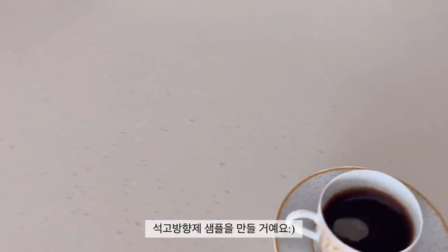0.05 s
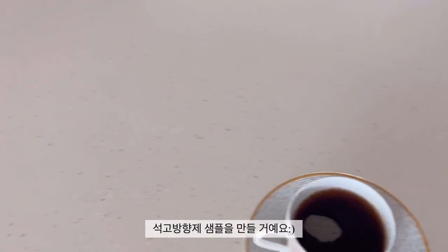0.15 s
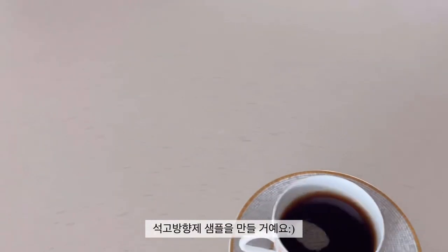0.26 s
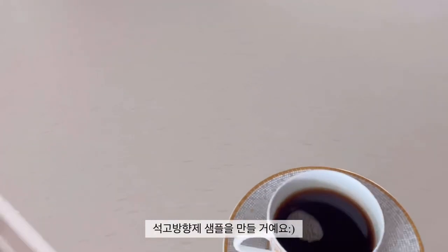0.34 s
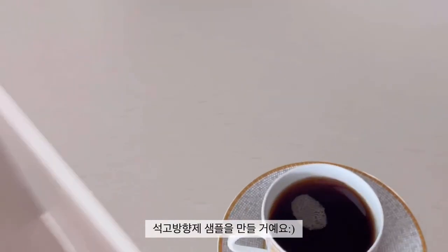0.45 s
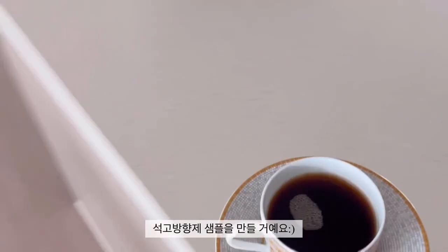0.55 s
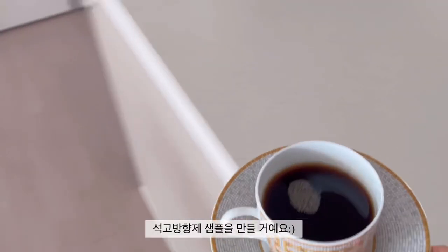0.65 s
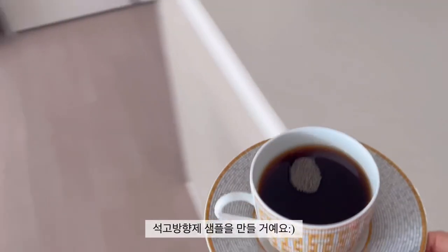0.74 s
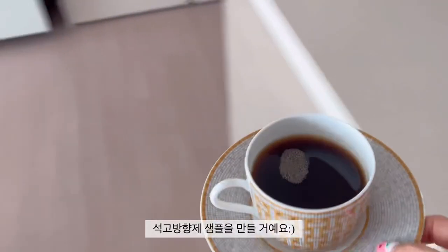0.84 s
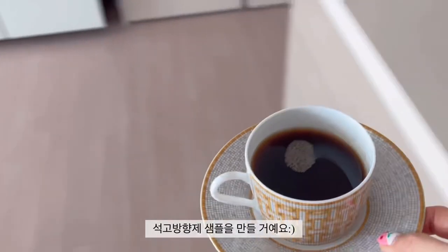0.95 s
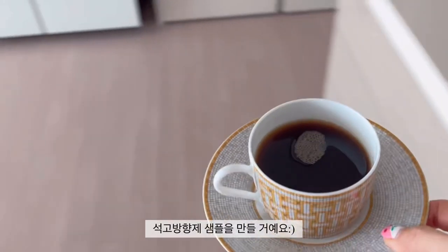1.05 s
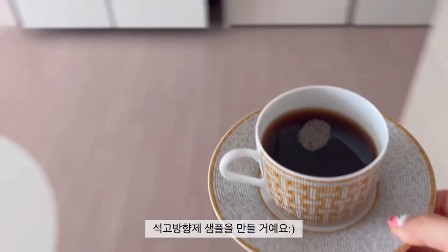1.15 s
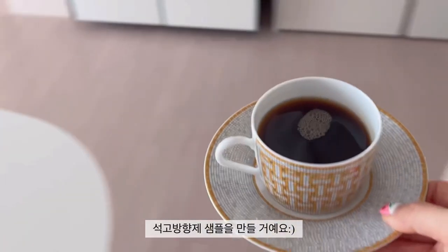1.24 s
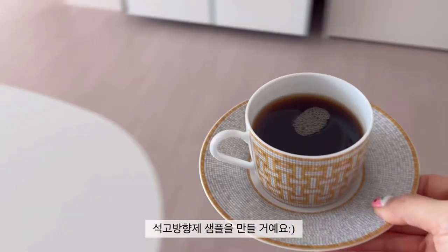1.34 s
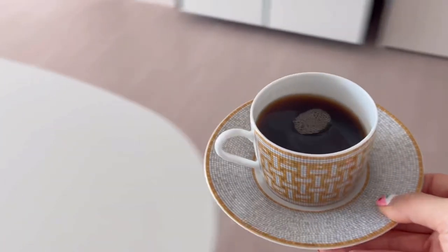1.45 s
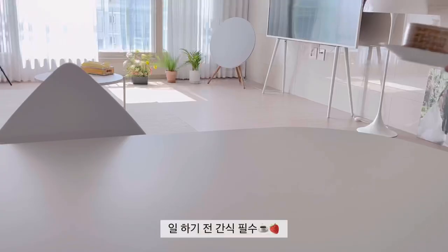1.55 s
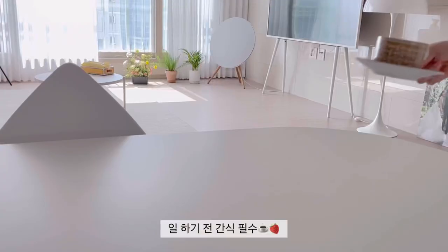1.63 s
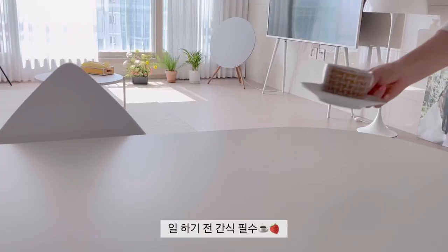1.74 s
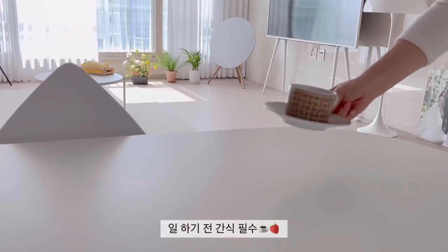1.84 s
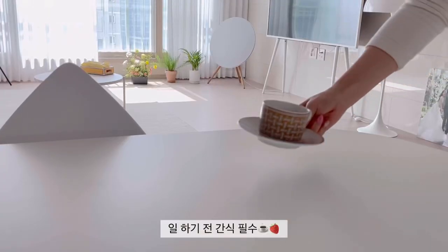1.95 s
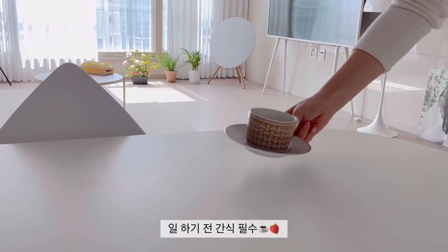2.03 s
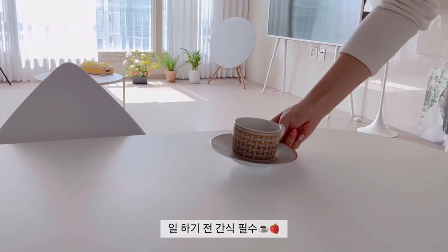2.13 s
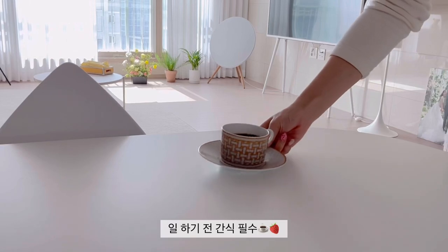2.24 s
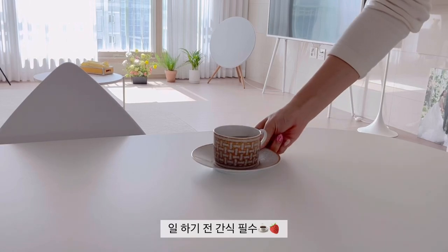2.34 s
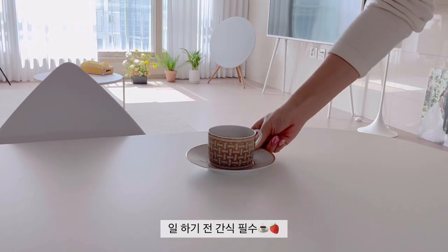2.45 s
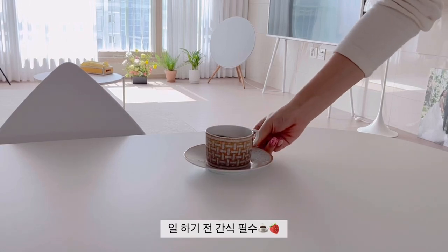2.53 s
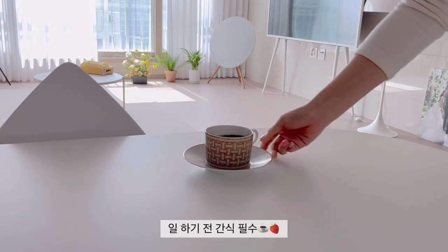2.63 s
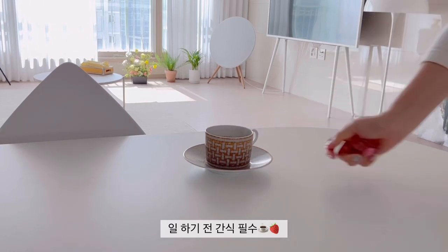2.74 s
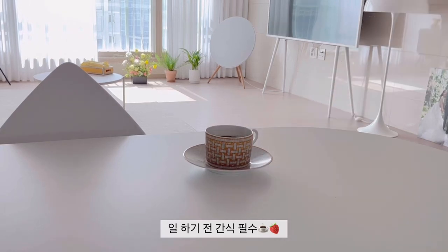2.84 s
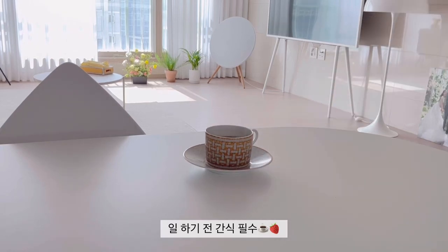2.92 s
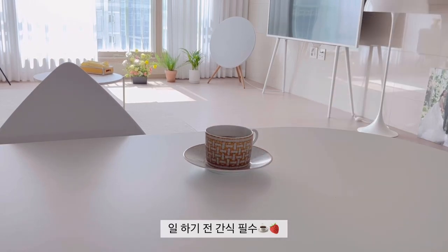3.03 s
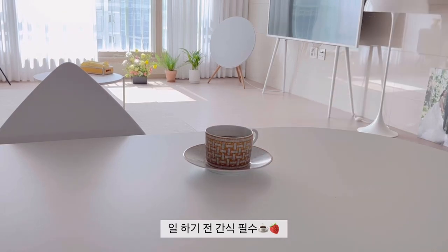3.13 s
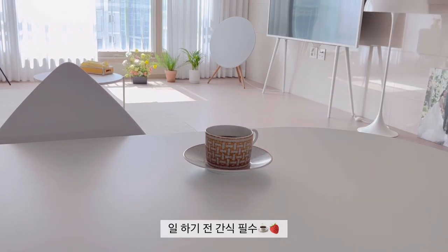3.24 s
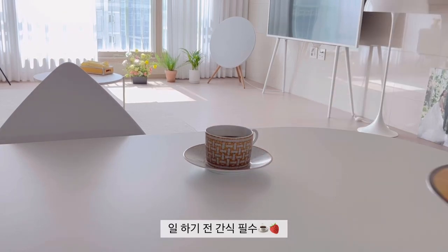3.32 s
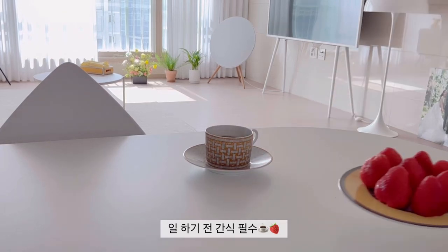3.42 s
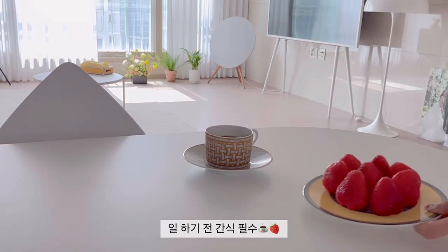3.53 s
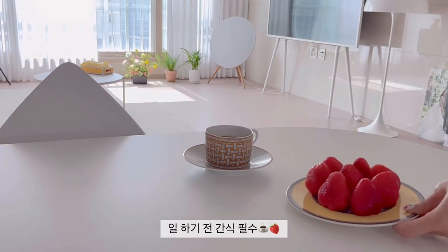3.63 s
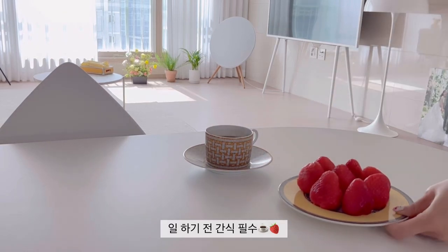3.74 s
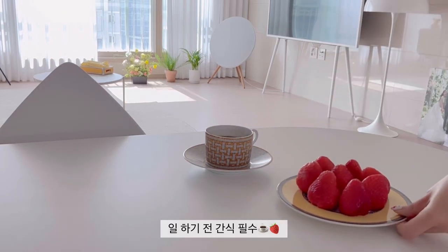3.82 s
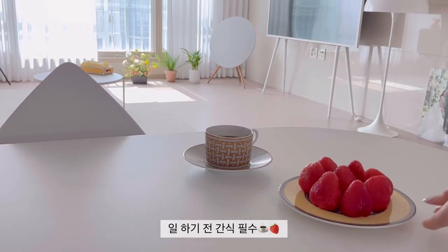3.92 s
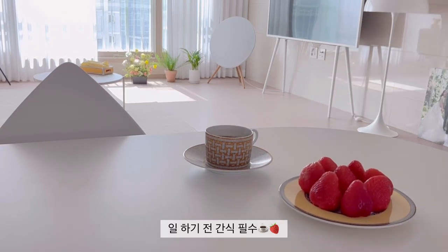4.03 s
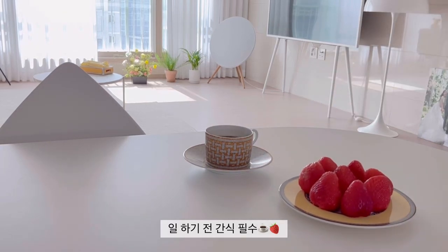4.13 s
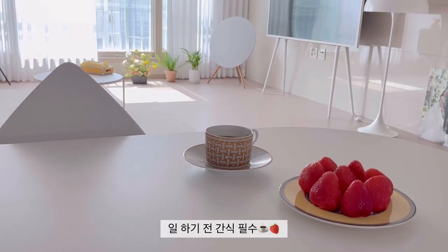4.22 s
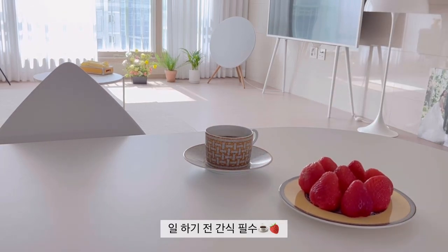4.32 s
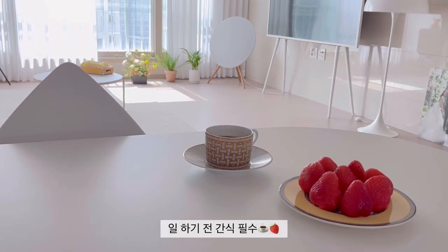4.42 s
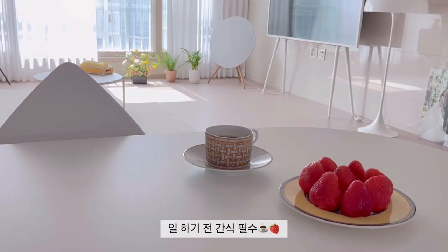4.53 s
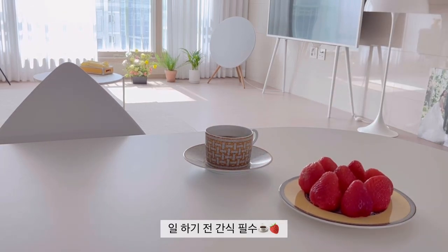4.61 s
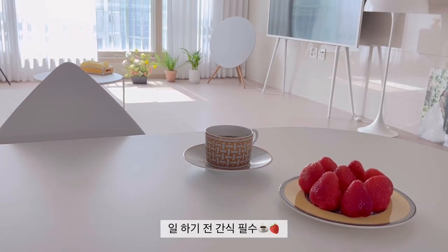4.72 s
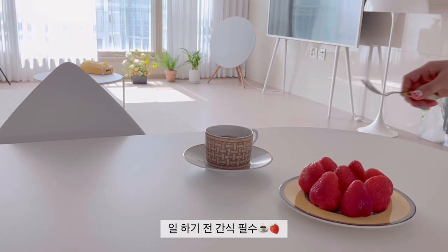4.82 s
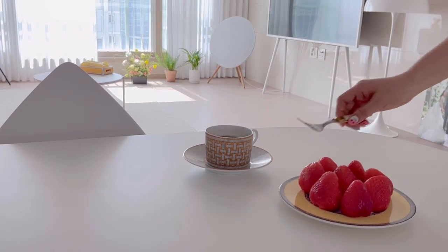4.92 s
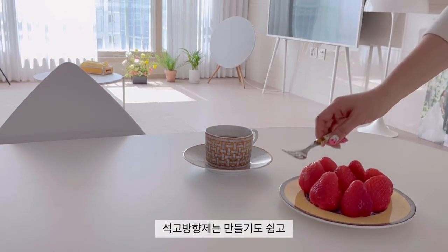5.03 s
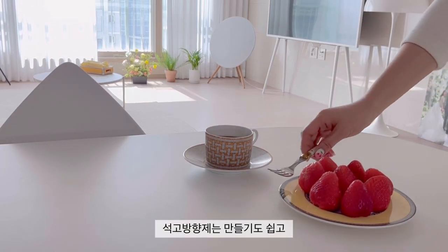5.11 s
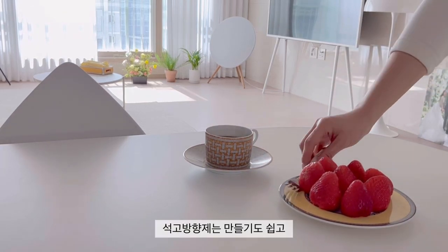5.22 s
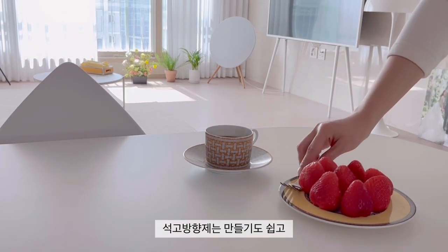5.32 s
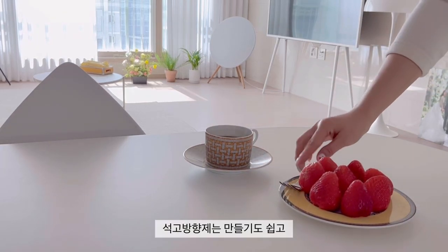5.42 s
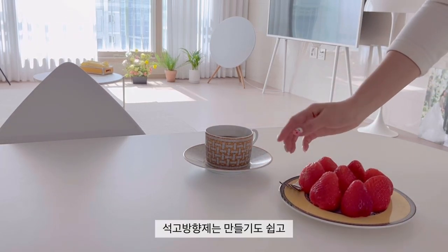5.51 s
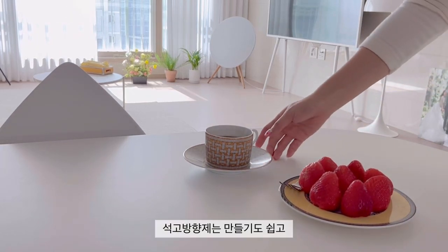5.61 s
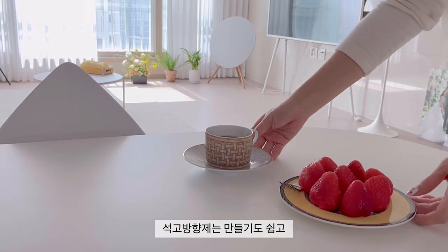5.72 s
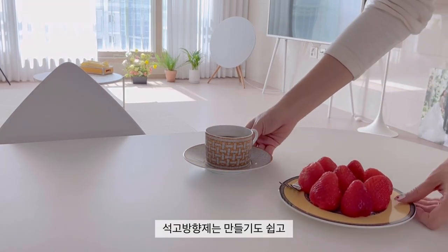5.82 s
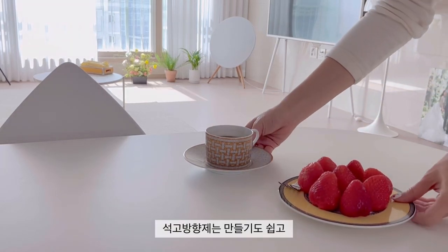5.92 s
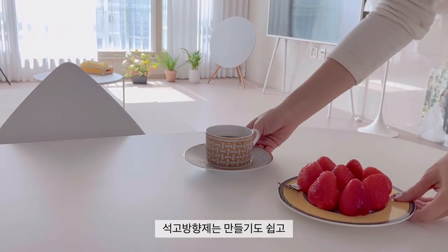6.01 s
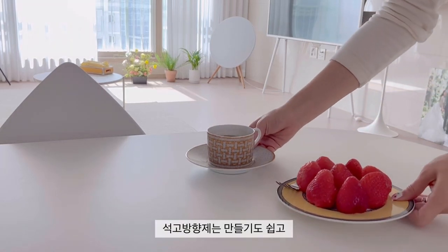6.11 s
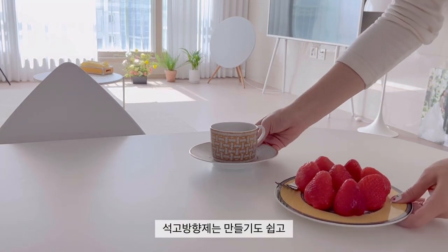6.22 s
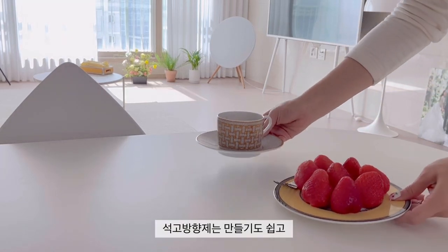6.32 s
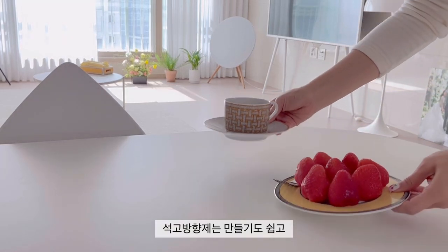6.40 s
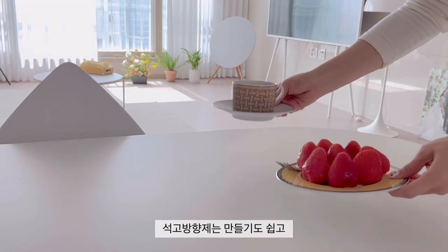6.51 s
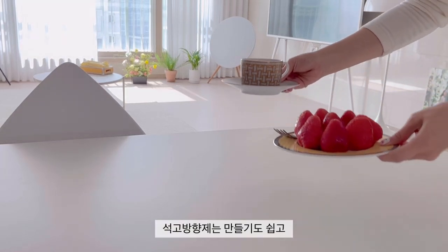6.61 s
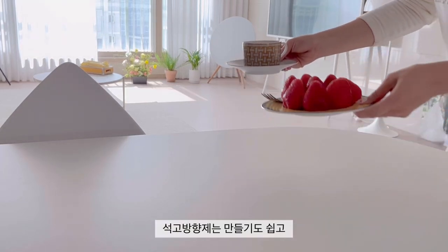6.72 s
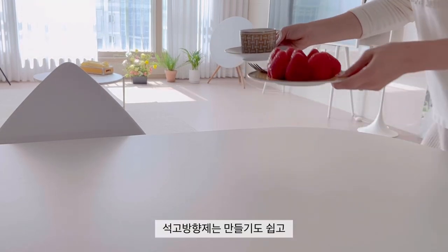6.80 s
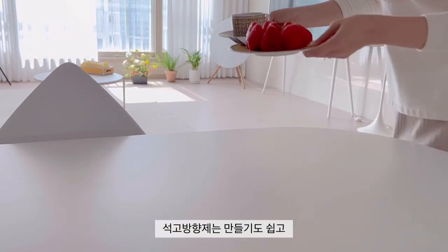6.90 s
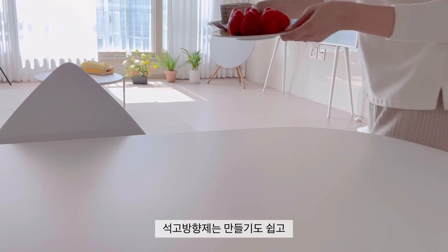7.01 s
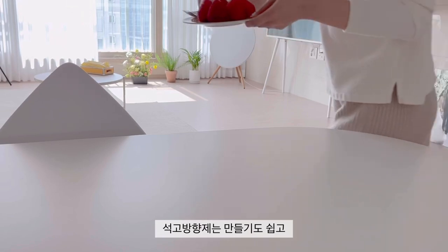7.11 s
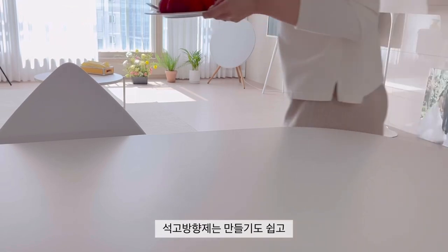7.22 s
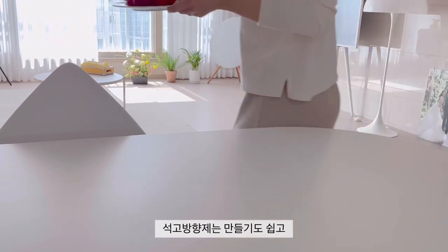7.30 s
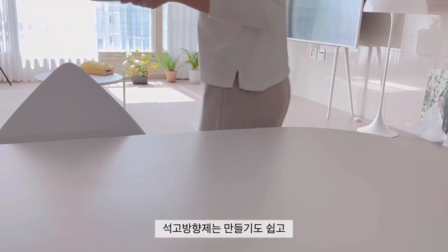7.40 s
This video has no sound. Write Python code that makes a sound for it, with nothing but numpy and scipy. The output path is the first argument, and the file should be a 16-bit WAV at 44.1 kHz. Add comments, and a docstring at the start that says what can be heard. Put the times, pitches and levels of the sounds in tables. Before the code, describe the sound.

A quiet, bare, reflective room with soft low rumble, heard closely in stereo. From 0 to 1.4 s a cup ticks faintly and irregularly on its saucer, dull and small, with barely audible brushing; a clearer soft swish comes at 1.65. At 2.18 the saucer hits the hard table with a firm knock, followed by a louder, sharper one at 2.33, woody with slight porcelain ring and short room tail. Near-quiet follows until a hiss at 3.5 and a single plate thud at 3.63, with a small settling scrape at 3.9. At 4.8 soft heel thuds, ticks and a slipper scuff. A fork clinks brightly in four quick contacts, 5.2 to 5.4. Faint grip clicks at 5.6 to 5.75; low, juddering drags from 5.8 to 6.4, strongest at 6.03, with a light clink at 6.21. Light brushing and muffled heel thuds at 6.76, 7.25 and 7.36 close it.

```python
"""A cup rattles faintly on its saucer as it is carried in, then the pair is set on a hard table in a bare room.
A plate follows, a fork is laid on it, and both are dragged and lifted; slippers scuff, heels thud.
Contacts are dying sines plus noise bursts; the drag is slip pulses through resonances plus gritty noise.
Brushing, scraping and room tone are shaped noise. Walls answer the crockery; playing speed scales their
answer and the stereo pattern by section."""
import sys
import numpy as np
from scipy import signal
from scipy.fft import rfft, irfft, next_fast_len
from scipy.io import wavfile
from scipy.ndimage import map_coordinates

SR = 44100
rng = np.random.default_rng(int(sys.argv[2]) if len(sys.argv) > 2 else 0)


def unload_wav(signal):
    """Save mono or channel-first audio to the path in sys.argv[1] as 16-bit WAV at rate SR, clipped to [-1, 1]."""
    wavfile.write(
        sys.argv[1],
        SR,
        np.round(np.clip(np.atleast_2d(signal).T, -1, 1) * 32767).astype(np.int16),
    )


N = 328759

# Contacts of saucer, plate, fork, gripped plate, lifted pieces:
# t/s, level/dB, ring/dB re level, puff/dB re level, hardness/(dB/octave), decay length/x
SAUCER_HITS = [(2.18, -16, -38, -3.5, -1.5, 0.69), (2.198, -25, -34.5, 0, 0.03, 0.26),
               (2.330, -13.5, -28, -6.5, -0.58, 0.48)]
PLATE_HITS = [(3.629, -19.5, -8.5, -5, 1, 1), (3.904, -38.5, -33, 3.5, 0.18, 0.35),
              (3.92, -43, -8.5, -2, 0.39, 0.546)]
FORK_HITS = [(5.206, -21, -8.5, -15.5, -0.67, 1.96), (5.296, -15, -5, -20.5, 0.67, 0.76),
             (5.362, -26.5, -8.5, -5.5, -1.2, 1.6), (5.406, -25, -4.5, -13, 0.5, 0.81)]
GRIP_HITS = [(5.6082, -49, -2, -1.5, 0.14, 1), (5.667, -33.5, -3, -6.5, 0.51, 0.64),
             (5.6744, -34, -6.5, -9.5, 0.71, 0.98), (5.7394, -48, 7, -5.5, 0.45, 0.38)]
LIFT_HITS = [(6.1075, -62, -11, -7, 0.6, 0.83), (6.1812, -53.5, -11.5, -18, 0.63, 1),
             (6.2106, -28, -6.5, -11.5, 0.16, 1)]

# Modes of each object: f/Hz, level/dB, t60/s; each contact scales t60 by its length, except for the cup
TABLE_MODES = [(65, -22, .5), (101.5, -22, 0.31), (157, -18.5, 0.52), (218.1, -14, 0.3), (307, 1.5, 0.41),
               (359.8, -6, 0.34), (569, -18.5, 0.49), (660, -8, 0.12), (711, -16, 0.4), (816, -4, .15),
               (1040, -15, 0.15), (1184, -11, 0.067), (1547, -9, 0.45), (1680, -11, 0.2), (2050, -18, .1),
               (2449, -4, 0.069), (2660, -7.5, 0.041)]
CUP_MODES = [(1766, 3, .25), (3671, -1, .33), (3725, -4, .33), (4323, -4, .3), (4360, -9, .3),
             (5114, -3, .3), (5180, -3, .2), (6961, -8, .35), (8021, -22, .2), (9028, -14, .2),
             (9500, -22, .2), (10860, -22, .3), (11300, -26, .3)]
PLATE_MODES = [(231, -6, .17), (280, -1, .19), (388, 1, .1), (550, -10, .08), (750, -10, .06),
               (1130, -7, .07), (1290, -2, .06), (1497, -9, .06), (1690, -11, .05), (2040, 2.5, .04),
               (2589, -12, .04), (3500, -18, .03)]
FORK_MODES = [(3467, -16, .08), (3950, -3, .012), (5440, 0, .024), (5425, -23, .2), (7700, -3, .022),
              (7720, -25, .25), (750, -14, .03), (1750, -18, .08), (10190, -8, .05), (13020, -6, .025),
              (13530, -18, .04), (15080, -24, .02)]
GRIPPED_MODES = [(2070, 0.5, 0.0093), (2380, 10.5, 0.005), (3480, -7.5, 0.025), (5860, -19.5, 0.0063),
                 (7700, -15, 0.011)]
LIFTED_MODES = [(1620, -7, .04), (2800, -5, .02), (4490, 0, .01), (6089, -8, .07), (8070, -14, .03),
                (10370, -8, .04), (12980, -12, .03)]

# Puff colours: dense table modes under saucer, under plate, small hard contacts; f/Hz, relative density/dB
KNOCK_SPECTRUM = [(60, -63.5), (140, -14.5), (300, 3.5), (700, -6.5), (1700, -8), (3000, -20),
                  (4400, -45.5), (9600, -60), (13000, -78.5)]
THUD_SPECTRUM = [(90, -59), (200, -4.5), (380, 4.5), (800, -2.5), (1400, 2.5), (2200, -9.5), (4000, -25.5),
                 (8000, -53), (14000, -51)]
CLATTER_SPECTRUM = [(200, -51), (500, 11.5), (1500, 8.5), (4000, 2.5), (8000, -2.5), (11000, -17),
                    (14000, -12), (17000, -24.5)]

# Pulls of the plate's foot over the top: start/s, length/s, judder/dB, scrape/dB
PULLS = [(5.827, 0.12, -63.5, -78), (6.025, 0.17, -44, -62.5), (6.218, 0.15, -58, -70)]
# Resonances driven by the drag: f/Hz, width/Hz, level/dB
DRAG_RESONANCES = [(209, 66, -11.5), (343, 110, -11), (430, 69, -8), (522, 195, -16.5)]

# Cup on saucer: t/s, tick level/dB, ring level/dB, tick f/Hz, tick t60/s
RATTLE = [(0.142, -60, -74.5, 1440, .025), (0.177, -58.5, -82, 980, 0.11), (0.311, -57, -73.5, 970, 0.031),
          (0.371, -53, -83, 890, 0.042), (0.411, -62, -97, 1110, 0.044), (0.591, -70, -93, 880, .05),
          (0.771, -60.5, -92, 860, 0.15), (0.827, -57, -77.5, 860, 0.043),
          (1.329, -63.5, -90.5, 1160, 0.038)]
# Small dry ticks: t/s, level/dB, f/Hz, t60/s
TICKS = [(0.188, -68, 4100, 0.022), (0.2018, -61, 4010, 0.018), (2.7795, -78, 1520, .015),
         (2.8994, -72, 2160, 0.016), (4.79, -47, 3370, 0.0094), (4.8344, -47.5, 2410, 0.023),
         (6.846, -66, 1030, .08), (7.055, -60, 335.4, 0.073)]
# Tail of an earlier clink, also the dry part of a tap: f/Hz, relative density/dB
FADING_SPECTRUM = [(400, -23), (900, -5), (1700, 4), (2600, -13), (5000, -22), (9000, -26)]

# Heels on the floor: t/s, level/dB, floor f/Hz, t60/s, overtones/dB re level
HEELS = [(4.779, -42.5, 95, 0.17, -5.5), (4.808, -42.5, 86, 0.32, -4.5), (6.759, -42, 67, 0.23, -17.5),
         (7.25, -34, 70.7, 0.2, -27), (7.359, -44.5, 59.2, 0.18, -16)]

# Brushing and scraping noises: slippers, sleeves, fingers, plate settling or sliding, rattle as it is gripped:
# start/s, rise/s, hiss/dB, fade t60/s, rasp/dB re hiss
STROKES = [(0.185, 0.035, -79.5, .2, 1.5), (0.785, 0.02, -82, 0.33, -9), (0.945, 0.023, -83.5, 0.17, -17),
           (1.06, 0.087, -90.5, .5, -2), (1.52, .012, -86.5, 0.84, -3.5), (1.64, 0.043, -59, 0.53, -1),
           (2.788, 0.019, -77, 0.12, -15), (2.89, 0.015, -85, .27, 3), (3.44, 0.058, -74, 0.44, -15),
           (3.513, 0.03, -61.5, .3, -15.5), (3.65, 0.055, -87.5, 0.62, 17), (3.86, 0.029, -78.5, 0.2, 9.5),
           (3.9, .015, -62.5, 0.083, 2), (3.985, 0.02, -72.5, 0.29, -15), (4.145, 0.02, -83, 0.29, -15),
           (4.75, 0.015, -74.5, 0.24, -28), (4.784, 0.017, -63, 0.28, 3.5),
           (4.988, 0.019, -64.5, 0.28, -12.5), (5.606, 0.0066, -78, .15, -3.5),
           (5.611, .02, -78, 0.47, 15.5), (5.662, 0.0085, -66.5, 0.21, 7), (5.76, 0.026, -76, 0.22, -28),
           (5.94, 0.029, -90, .15, -15), (6.42, 0.015, -79, .35, -18), (6.718, 0.019, -76.5, 0.4, -3),
           (6.8, .02, -82, 0.3, -4), (6.875, .02, -74.5, 0.35, -5), (7.204, 0.022, -74, 0.5, -8.5),
           (7.31, 0.029, -79, 1.5, -7.5)]
# Colours of the brushing and scraping: f/Hz, relative density/dB
HISS_SPECTRUM = [(2500, -48.5), (5000, -4), (7000, 2.5), (11000, -0.5), (15000, -3.5), (16000, -29)]
RASP_SPECTRUM = [(1200, -18), (2200, -6), (4000, 1), (5500, -4), (8000, -27)]

# Room tone, mean levels: t/s, rumble/dB, hum/dB, hush/dB
AIR_LEVELS = [(0, -65.5, -68, -83.5), (.21, -67, -70.5, -81), (.62, -68.5, -72.5, -83.5),
              (.84, -63, -70, -82.5), (1.16, -70, -62.5, -79), (1.5, -67, -71, -83.5),
              (1.7, -66.5, -78.5, -88.5), (2.03, -76, -78.5, -85), (2.9, -75, -71.5, -80),
              (3.3, -69, -71, -81.5), (4.15, -63, -68.5, -80.5), (4.53, -68.5, -72.5, -81.5),
              (4.75, -69, -68.5, -76.5), (5.1, -68.5, -68.5, -80.5), (5.95, -66, -61, -77.5),
              (6.55, -69.5, -74, -81.5), (6.9, -64, -67, -77), (7.15, -64.5, -70.5, -81),
              (7.45, -59, -66.5, -77.5)]
# Colours of the room tone: f/Hz, relative density/dB
RUMBLE_SPECTRUM = [(13, -35.5), (22, -13), (43, -2), (59, 5.5), (97, 0.5), (130, -13.5), (166, -1.5),
                   (200, -10.5), (260, -37), (440, -120)]
HUM_SPECTRUM = [(71, -29.5), (120, 1.5), (157, -9.5), (242, -4.5), (307, -7), (419, -9), (1000, -28),
                (1300, -54.5), (2200, -120)]
HUSH_SPECTRUM = [(350, -33.5), (600, -0.5), (1700, -8.5), (2500, -15), (4000, -19), (8000, -21.5),
                 (12000, -21.5), (14000, -30), (16000, -33)]

# Wall decay at speed 1: f/Hz, t60/s
ROOM_T60 = [(150, 0.83), (400, 0.3), (1000, 0.45), (2700, 0.39), (7000, 0.3), (15000, 0.083)]
# Wall answer at speed 1: f/Hz, level/dB
ROOM_LEVELS = [(100, 0.5), (1000, -1.5), (3000, -3.5), (6000, -9), (14000, -5.5)]
# Sections whose ends stop the wall tails: from/s, to/s, playing speed/x
ROOM_SECTIONS = [(0, 2.78, .667), (2.78, 5.603, 1), (5.603, 7.5, .8)]
# Sections of the stereo split: from/s, to/s, playing speed/x
STEREO_SECTIONS = [(0, 2.78, .667), (2.78, 5.83, 1), (5.83, 7.5, .8)]
# Split between two microphone ports at speed 1: f/Hz, side over mid/dB
PORTS = [(40, -21), (100, -18.5), (250, -11.5), (500, -9), (900, -1), (2000, -2.5), (2800, -5.5),
         (3400, -23), (4400, -9.5), (6000, -9.5), (8000, -6), (9500, 5.5), (10100, 14), (10500, 13.5),
         (11200, -5), (12000, -5), (13500, -18), (15500, -6), (17000, 1), (18300, 17.5), (20000, 3.5),
         (24000, -3.5)]

TABLE_DB, CHATTER_DB = -11.5, -5  # table ring re blow, cup chatter re cup ring
SLIP_RATE_HZ, SLIP_SCATTER, SLIP_NOISE = 352.4, 0.12, 0.84  # mean rate, unevenness, noise rms re slips
PULL_RISE_S, SCRAPE_RISE_S, PULL_FADE_T60_S = 0.028, 0.062, 0.27
TAP_PUFF_DB, TICK_PUFF_DB = -11, -8  # broad part re the note
STROKE_HOLD = 0.66  # share of the rise time
TOP_HZ, EDGE_HZ = 15900, 16866  # treble shelf, band limit


def crockery():
    """Contacts ring each object with a randomly wavering level; a puff stands for its dense modes."""
    out = np.zeros(N)
    objects = [(PLATE_HITS, PLATE_MODES, THUD_SPECTRUM, 0.1),
               (FORK_HITS, FORK_MODES, CLATTER_SPECTRUM, 0.03),
               (GRIP_HITS, GRIPPED_MODES, CLATTER_SPECTRUM, 0.06),
               (LIFT_HITS, LIFTED_MODES, CLATTER_SPECTRUM, 0.035)]
    for hits, modes, dense, puff_t60_s in objects:
        for s, db, ring_db, puff_db, hard_db, length in hits:
            scaled_modes = np.multiply(modes, [1, 1, length])
            add(out, s, amp(db + ring_db) * ring(scaled_modes, hard_db))
            add(out, s, amp(db + puff_db) * puff(dense, hard_db, puff_t60_s * length))
    for s, db, ring_db, puff_db, hard_db, length in SAUCER_HITS:
        table_modes = np.multiply(TABLE_MODES, [1, 1, length])
        add(out, s, amp(db + TABLE_DB) * ring(table_modes, hard_db, rough_db=5.0))
        add(out, s, amp(db + ring_db) * ring(CUP_MODES, rough_db=7.0))
        add(out, s, amp(db + puff_db) * puff(KNOCK_SPECTRUM, hard_db, 0.14))
        add(out, s, amp(db + ring_db + CHATTER_DB) * puff(CLATTER_SPECTRUM, -0.28, 0.36))
    return out


def drag():
    """Uneven slips drive the low resonances; grit scrapes in the mids."""
    cycle = np.cumsum(SLIP_RATE_HZ * (1 + SLIP_SCATTER * wobble(60))) / SR
    slips = np.diff(np.floor(cycle), prepend=0) * amp(2.5 * wobble(150))

    def foot(hz):
        """Resonances of alternating sign; a blunt foot excites little treble."""
        body = 0
        for k, (centre, width, db) in enumerate(DRAG_RESONANCES):
            damping = 1j * hz * width
            body = body + (-1) ** k * amp(db) * damping / (centre * centre - hz * hz + damping)
        return body / (1 + 1j * hz / 600) ** 2

    drive = unit(slips) + SLIP_NOISE * rng.standard_normal(N)
    judder = unit(filtered(drive, foot))
    grit_spectrum = [(500, -32.5), (1000, 0.5), (1700, 4), (3000, -11), (6000, -31), (12000, -35.5)]
    grain = amp(2.5 * wobble(120))
    grit = unit(grain * noise(grit_spectrum)[0])
    out = np.zeros(N)
    for s, length_s, judder_db, scrape_db in PULLS:
        grip = swell(s, PULL_RISE_S, length_s - PULL_RISE_S, PULL_FADE_T60_S)
        scrape = swell(s, SCRAPE_RISE_S, length_s - SCRAPE_RISE_S, PULL_FADE_T60_S)
        out += amp(judder_db) * grip * judder + amp(scrape_db) * scrape * grit
    return out


def taps():
    """Faint close taps, too weak to wake the room: short notes with puffs, after the end of a clink."""
    out = np.zeros(N)
    add(out, 0, amp(-64.0) * puff(FADING_SPECTRUM, 0, 0.34))
    for s, db, ring_db, hz, t60 in RATTLE:
        tick_modes = [(hz, 0, t60), (1.123 * hz, -6, 0.78 * t60), (1.53 * hz, -9, 0.18 * t60)]
        add(out, s, amp(db) * ring(tick_modes))
        add(out, s, amp(ring_db) * ring([(1740, 0, 0.35)]))
        add(out, s, amp(db + TAP_PUFF_DB) * puff(FADING_SPECTRUM, -16, 0.037))
    for s, db, hz, t60 in TICKS:
        crack = [(hz / 3, -30), (hz, 0), (2.5 * hz, -4), (5 * hz, -40)]
        add(out, s, amp(db) * ring([(hz, 0, t60), (1.19 * hz, -3, 0.94 * t60)]))
        add(out, s, amp(db + TICK_PUFF_DB) * puff(crack, 0, t60))
    return out


def heels():
    """Soft heels swing the floor at a low note with two weaker, faster-dying overtones."""
    out = np.zeros(N)
    for s, db, hz, t60, over_db in HEELS:
        modes = [(hz, 0, t60), (2.1 * hz, over_db, 0.679 * t60), (3.1 * hz, over_db - 4, 0.51 * t60)]
        add(out, s, amp(db) * ring(modes, cycles=0.73, rough_db=6.0))
    return out


def brushes_and_scrapes():
    """Brushing and scraping: fine grainy hiss with a lower rasp, weighted stroke by stroke."""
    grain = amp(0.71 * wobble(98))
    hiss, rasp = noise(HISS_SPECTRUM), noise(RASP_SPECTRUM)
    s, rise_s, db, t60, rasp_db = np.transpose(STROKES)[:, :, None]
    strength = amp(db) * swell(s, rise_s, STROKE_HOLD * rise_s, t60)
    hiss_gain = strength.sum(0)
    rasp_gain = (amp(rasp_db) * strength).sum(0)
    return grain * (hiss_gain * hiss + rasp_gain * rasp)


def air():
    """Room tone: three noise bands of drifting level, the bass in the largest lumps."""
    rumble_db, hum_db, hush_db = curves(AIR_LEVELS)
    rumble = amp(rumble_db + 2.9 * wobble(5.6)) * noise(RUMBLE_SPECTRUM)
    hum = amp(hum_db + 1.2 * wobble(4.6)) * noise(HUM_SPECTRUM)
    hush = amp(hush_db + 0.7 * wobble(4.2)) * noise(HUSH_SPECTRUM)
    return rumble + hum + hush


def room(x, speed):
    """Each frequency of the walls' answer dies at its own pace, stretched by slower play."""
    hz, t, z = signal.stft(rng.standard_normal((2, SR)), SR, nperseg=256)
    decay = amp(-60 * t * speed / along(ROOM_T60, hz / speed)[:, None])
    norm = np.linalg.norm(decay, axis=1, keepdims=True)
    decay *= amp(along(ROOM_LEVELS, hz / speed))[:, None] / norm
    tail = signal.istft(z * decay, SR, nperseg=256)[1] / np.sqrt(128)
    delayed = np.pad(x, (250, 0))  # 5.7 ms
    return signal.fftconvolve(delayed[None], tail, axes=1)[:, :len(x)]


def ring(modes, tilt_db=0, cycles=0.3, rough_db=3.5):
    """Dying sines, built up over a fraction of a cycle, random in strength and waver; tilt in dB/octave."""
    t = np.arange(SR // 2) / SR
    hz, db, t60 = np.transpose(modes)[:, :, None]
    strength_db = 1.5 * rng.standard_normal(hz.shape)
    waver = signal.resample(rng.standard_normal((len(hz), 30)), len(t), axis=1)
    waver_db = rough_db * waver * np.minimum(t / 0.031, 1)
    level_db = db + tilt_db * np.log2(hz / 1000) + strength_db + waver_db
    onset = 1 - np.exp(-t * hz / cycles)
    return (amp(level_db - 60 * t / t60) * np.sin(2 * np.pi * hz * t) * onset).sum(0)


def puff(spectrum, tilt_db, t60):
    """Dying burst of coloured noise, 0.4 ms onset; tilt in dB/octave about 1 kHz."""
    t = np.arange(SR // 5) / SR
    tilted = [(hz, db + tilt_db * np.log2(hz / 1000)) for hz, db in spectrum]
    return noise(tilted, size=len(t))[0] * amp(-60 * t / t60) * (1 - np.exp(-t / 0.0004))


def swell(start_s, rise_s, hold_s, t60):
    """Gain that rises as a square, holds and dies away exponentially."""
    t = np.arange(N) / SR - start_s
    return np.clip(t / rise_s, 0, 1) ** 2 * amp(-60 * np.maximum(t - rise_s - hold_s, 0) / t60)


def noise(spectrum, size=N):
    """Two unrelated noises of that colour, joint rms 1."""
    return unit(filtered(rng.standard_normal((2, size)), lambda hz: amp(along(spectrum, hz))))


def wobble(rate_hz):
    """Smooth random curve, rate_hz knots a second."""
    return map_coordinates(rng.standard_normal(int(N * rate_hz / SR) + 4), [np.arange(N) * rate_hz / SR])


def filtered(x, response):
    """x times a complex response of frequency, zero-padded."""
    m = next_fast_len(x.shape[-1] + 8192)
    return irfft(rfft(x, m) * response(np.fft.rfftfreq(m, 1 / SR)), m)[..., :x.shape[-1]]


def along(points, hz):
    """(Hz, value) points interpolated on a log frequency axis."""
    f, v = np.transpose(points)
    return np.interp(np.log(hz + 1), np.log(f + 1), v)


def curves(rows):
    """One value per sample for each column after the time."""
    s, *cols = np.transpose(rows)
    return [np.interp(np.arange(N) / SR, s, c) for c in cols]


def add(track, s, x):
    """Mixes x into track from time s."""
    part = track[round(s * SR):][:len(x)]
    part += x[:len(part)]


def amp(db):
    """Gain of a level in dB."""
    return 10 ** (np.asarray(db) / 20)


def unit(x):
    """x at rms 1."""
    return x / np.sqrt(np.mean(x ** 2) + 1e-20)


def scene():
    """Sums the sources; walls answer the crockery, then two ports hear mid plus and minus side."""
    near = crockery()
    pair = drag() + taps() + heels() + brushes_and_scrapes() + air()
    for start_s, end_s, speed in ROOM_SECTIONS:
        section = slice(round(start_s * SR), round(end_s * SR))
        pair[:, section] += near[section] + room(near[section], speed)
    out = np.zeros((2, N))
    for start_s, end_s, speed in STEREO_SECTIONS:
        section = slice(round(start_s * SR), round(end_s * SR))

        def split(hz):
            """Mid and side gains; slower play shifts the pattern down, a path difference turns the phase."""
            angle = np.arctan(amp(along(PORTS, hz / speed)))
            return np.array([np.cos(angle), 1j * np.sin(angle)])

        mid, side = filtered(pair[:, section], split)
        out[:, section] = mid + side, mid - side
    return out


def record(dry):
    """Microphone drops the deep bass; the top of the band is shelved down, then cut."""
    def response(hz):
        """Two 45 Hz high-pass stages, -8 dB shelf, band limit."""
        bass = (1j * hz / 45 / (1 + 1j * hz / 45)) ** 2
        shelf = np.where(hz < TOP_HZ, 1, amp(-8))
        return bass * shelf * (hz < EDGE_HZ)

    return filtered(dry, response)


dry = scene()
out = record(dry)
unload_wav(out)
```